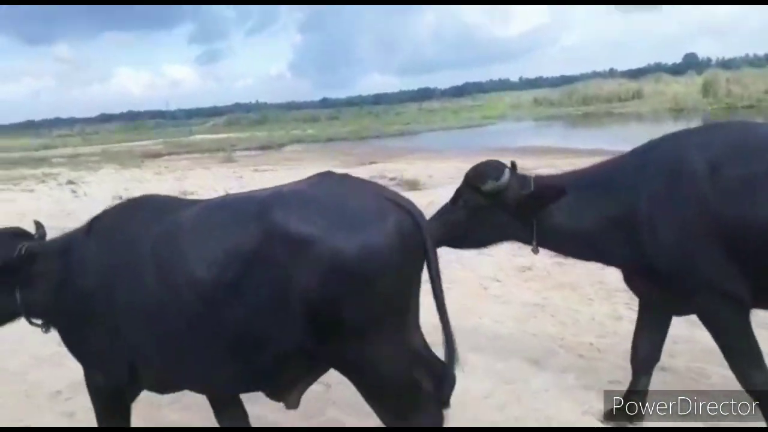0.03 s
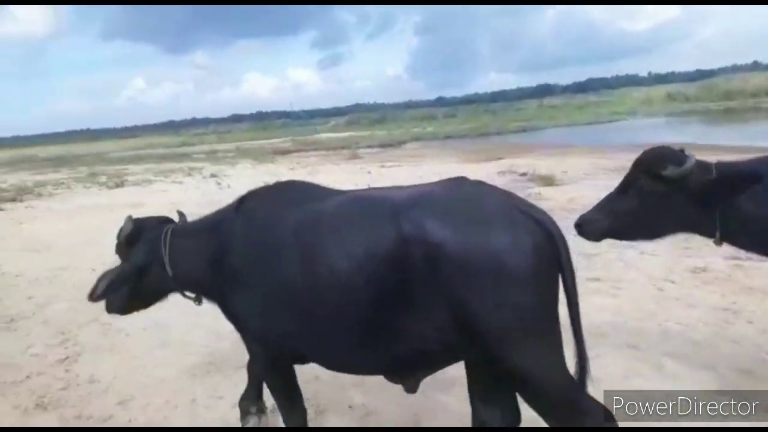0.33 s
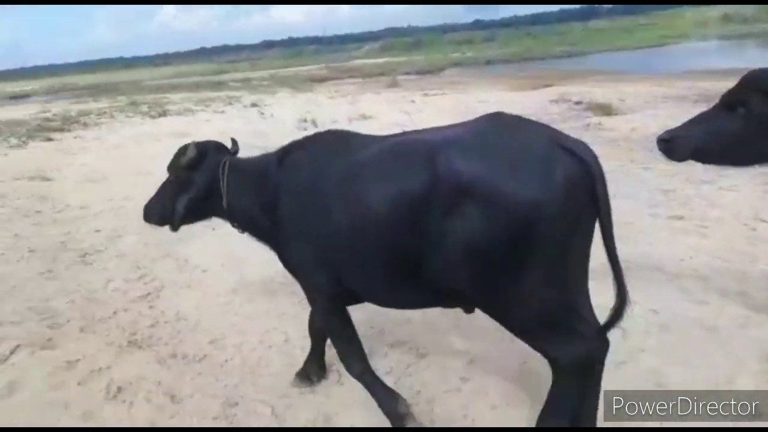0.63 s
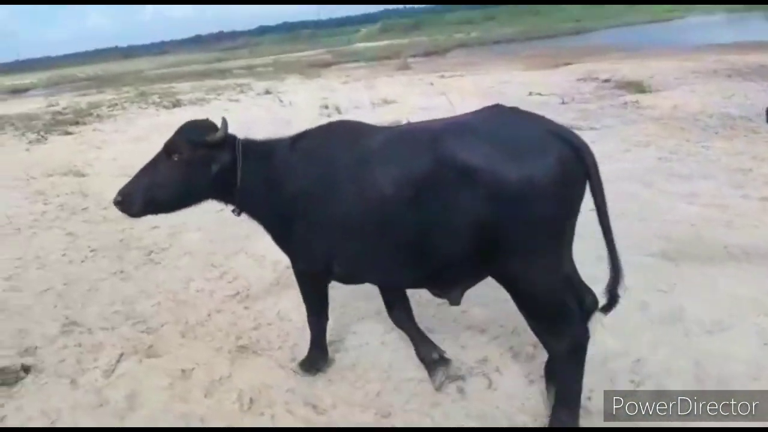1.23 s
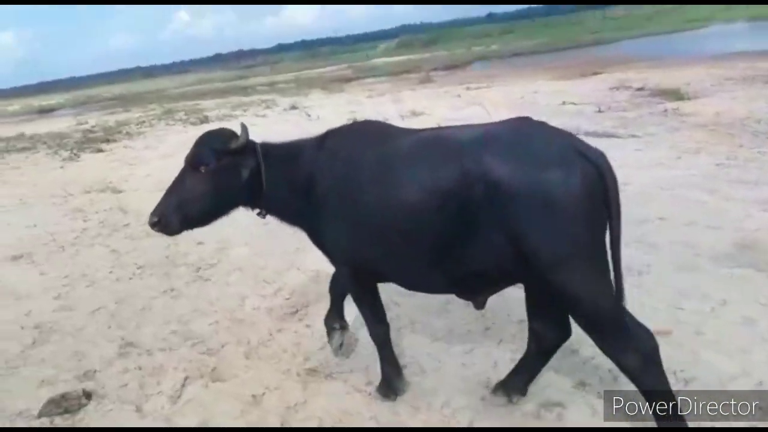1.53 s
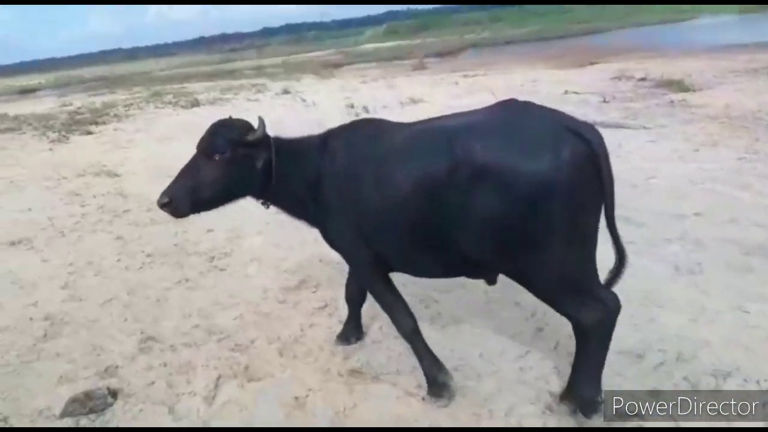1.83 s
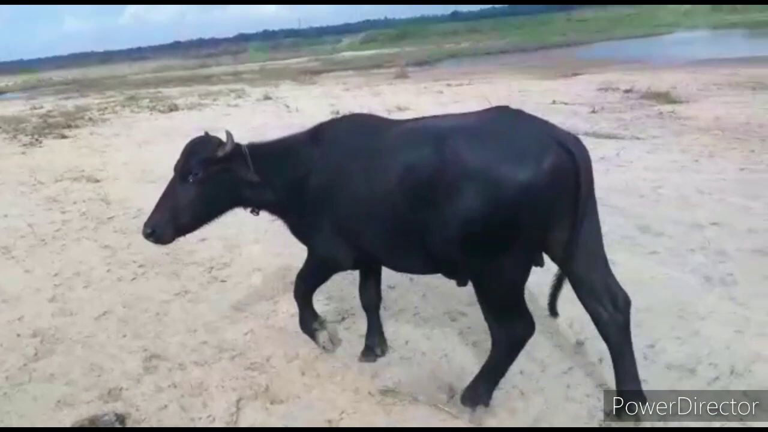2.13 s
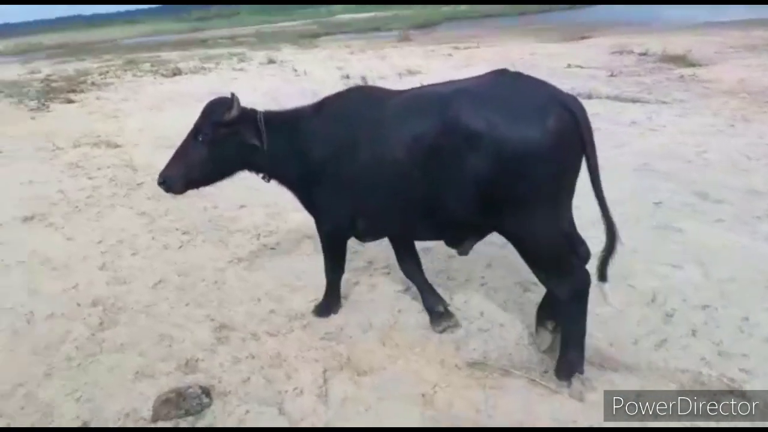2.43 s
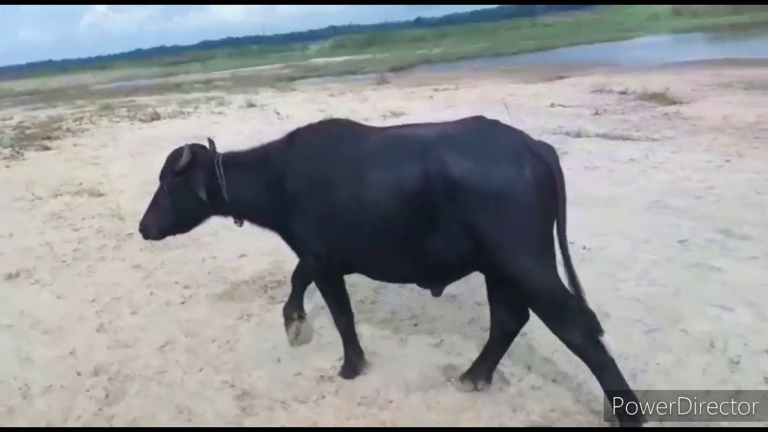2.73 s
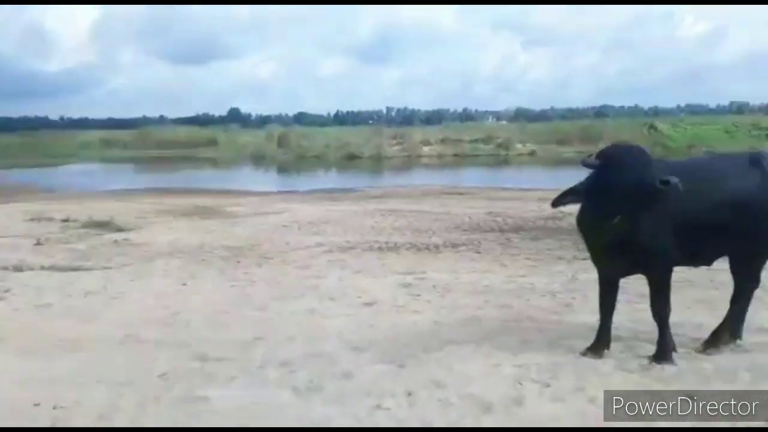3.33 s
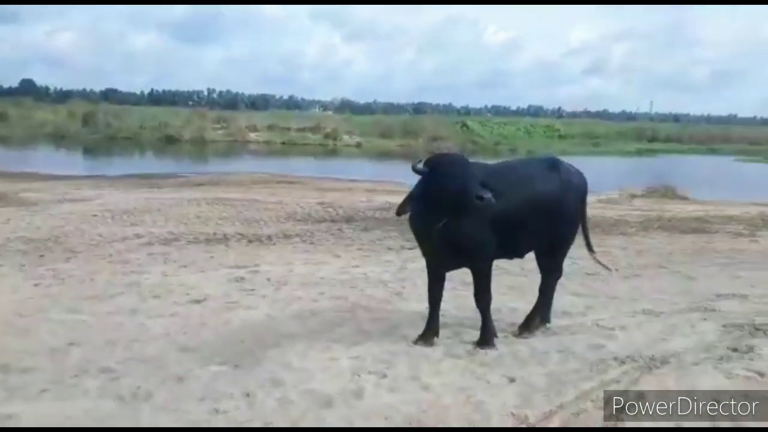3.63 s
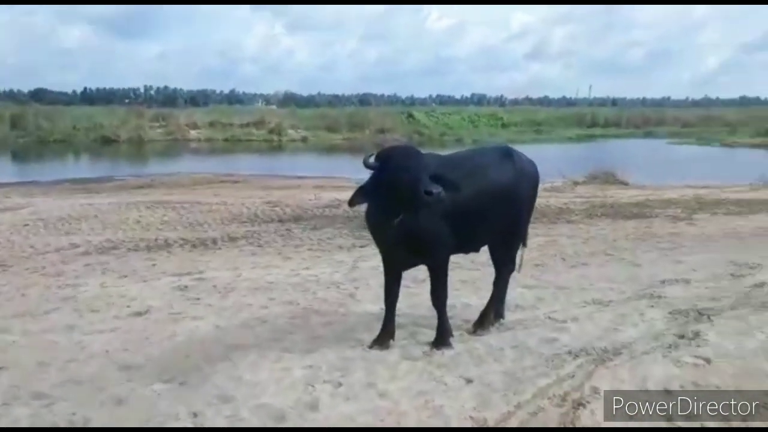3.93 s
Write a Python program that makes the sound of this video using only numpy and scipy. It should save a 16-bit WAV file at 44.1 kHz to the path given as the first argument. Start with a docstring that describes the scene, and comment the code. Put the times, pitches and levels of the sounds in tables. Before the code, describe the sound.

One brief, rough buffalo grunt, with light clicks, sandy scuffs and wind on the microphone.

```python
"""Sandy scuffs over a faint hiss as a water buffalo walks along a riverbank; small dry clicks sound now and
then. Halfway through it gives one short, creaky grunt. Slow pulses from its throat ring the mouth, nose and
throat cavity, while the mouth's ringing note sinks and rises again. Wind puffs and thumps on the microphone and
grows to a rumble at the end."""
import sys
import numpy as np
from scipy import signal
from scipy.fft import rfft, irfft, next_fast_len
from scipy.io import wavfile
from scipy.ndimage import uniform_filter1d, map_coordinates

SR = 44100
rng = np.random.default_rng(int(sys.argv[2]) if len(sys.argv) > 2 else 0)


def file_out(sig):
    """Save sig as 16-bit WAV at sys.argv[1]."""
    # one column per channel
    cols = np.atleast_2d(sig).T
    # limit, then scale
    lim = np.clip(cols, -1, 1)
    pcm = np.round(lim * 32767).astype(np.int16)
    wavfile.write(sys.argv[1], SR, pcm)


N = 176400

# tone colour of rubbing sand (frequency [Hz], level [dB])
SAND_COLOUR = [(200, -0.5), (700, -4.5), (2400, -0.5), (4000, -5), (5500, -13.5), (8500, -10), (11000, -21),
               (15500, -24)]


def amp(db):
    """Turn decibels into a factor to multiply by."""
    return 10 ** (np.asarray(db) / 20)


def unit(x):
    """Scale a sound to an average power of 1."""
    return x / np.sqrt(np.mean(x ** 2) + 1e-20)


def curves(rows):
    """Join a table's rows with straight lines: one curve for each column after the time."""
    times, *columns = np.transpose(rows)
    return [np.interp(np.arange(N) / SR, times, column) for column in columns]


def fade(t, t60):
    """Die away by 60 dB every t60 seconds."""
    return np.exp(-np.log(1000) * t / t60)


def wobble(rate):
    """A smooth curve through `rate` random points a second."""
    points = rng.standard_normal(int(N * rate / SR) + 4)
    return map_coordinates(points, [np.arange(N) * rate / SR])


def noise(colour):
    """Steady noise shaped by rows of (frequency [Hz], level [dB])."""
    row_hz, row_db = np.transpose(colour)
    hz = np.fft.rfftfreq(N, 1 / SR)
    gain = amp(np.interp(np.log(hz + 1), np.log(row_hz), row_db))
    return unit(irfft(rfft(rng.standard_normal(N)) * gain, N))


def add(track, start_s, sound):
    """Mix a sound into the track at the given time."""
    part = track[round(start_s * SR):][:len(sound)]
    part += sound[:len(part)]


def swell(peak_s, db, width_s):
    """Loudness that rises and falls in a bell shape."""
    t = np.arange(N) / SR
    return amp(db) * np.exp(-.5 * ((t - peak_s) / width_s) ** 2)


def grunt():
    """Each throat pulse rings the mouth, the nose and the throat cavity, and adds a short rasp."""
    # how fast the throat pulses (time [s], rate [pulses/s])
    pulse_rate = [(1.99, 22), (2.015, 46.4), (2.035, 52.2), (2.1, 55.7), (2.168, 57.9), (2.188, 84.9),
                  (2.215, 54.5), (2.245, 58.3), (2.31, 61.8)]
    # how the voice moves (time [s], level [dB], mouth note [Hz], spread around that note [octaves],
    # roughness [0-1], nose ring [dB])
    voice = [(1.993, -38, 2220, 0.2, 0.38, -8), (2.02, -31.5, 2180, 0.19, 0.42, -10),
             (2.04, -29, 1840, 0.2, 0.33, -4.5), (2.065, -24.5, 1620, 0.12, 0.19, -7),
             (2.11, -26.5, 1480, 0.17, 0.24, -9), (2.145, -26.5, 1290, 0.25, 0.3, -17),
             (2.165, -25.5, 1130, 0.18, 0.29, -15), (2.183, -25.5, 1175, .12, 0.04, -20),
             (2.195, -24, 1490, 0.59, 0.48, -8), (2.21, -23.5, 1180, .7, 0.49, -11),
             (2.228, -22, 1190, 0.37, .2, -36), (2.243, -23, 1570, 0.48, 0.28, -21),
             (2.26, -23.5, 1730, 0.18, 0.1, -13), (2.277, -25.5, 2170, 0.13, .16, -16),
             (2.312, -30, 2280, .15, 0, -5)]
    # notes the throat cavity rings at (frequency [Hz], level [dB], time to fade by 60 dB [s])
    cavity_notes = [(574, -6, 0.017), (812, -1.5, 0.017), (1175, -7, 0.037), (1498, -9, 0.037),
                    (1731, -6.5, 0.046), (2237, -6.5, 0.044), (2710, -13, 0.067), (3180, -9, 0.016),
                    (4200, -7, 0.026), (5800, -11, 0.023), (7100, -22, 0.026)]
    # tone colour of the rasp (frequency [Hz], level [dB])
    rasp_colour = [(200, -20), (550, 2.5), (1500, -1), (2750, -5), (2900, -20), (3080, -28), (3400, -5),
                   (3850, -29), (4350, -20.5), (5000, -20.5), (7000, -17.5), (9000, -37), (15000, -45.5)]
    start_s, end_s, nose_hz, far_note_db = 1.9931, 2.316, 2536, -11.5
    rate, = curves(pulse_rate)
    level_db, mouth_hz, spread, roughness, nose_db = curves(voice)
    voiced = np.arange(round(start_s * SR), round(end_s * SR))
    pulse_count = np.floor(np.cumsum(rate[voiced]) / SR)
    pulse_starts = voiced[np.diff(pulse_count, prepend=-1) > 0]
    out, t = np.zeros(N), np.arange(SR // 20) / SR
    rasp_noise = noise(rasp_colour)
    throat_band = signal.butter(2, [420, 3200], "bandpass", fs=SR, output="sos")
    attack = 1 - np.exp(-t / 0.00018)

    def note(hz, db, t60):
        return amp(db) * np.sin(2 * np.pi * hz * t) * fade(t, t60)

    for i in pulse_starts:
        ring = note(mouth_hz[i], db=-4, t60=0.014) + note(nose_hz, nose_db[i], t60=0.034)
        for hz, db, t60 in cavity_notes:
            # notes far from the mouth's note ring more weakly
            nearness = np.exp(-.5 * (np.log2(hz / mouth_hz[i]) / spread[i]) ** 2)
            note_hz = hz * (1 + rng.normal(0, 0.017))
            note_db = db + far_note_db * (1 - nearness) + rng.normal(0, 1.5)
            ring += note(note_hz, note_db, t60)
        rasp = amp(-2) * roughness[i] * rasp_noise[i:i + len(t)] * fade(t, t60=0.024)
        pulse = attack * rasp - signal.sosfilt(throat_band, attack * ring)
        add(out, i / SR, amp(level_db[i]) * pulse)
    return out


def with_echo(sound):
    """Add a weak, short echo from the ground and the animals around."""
    t = np.arange(SR // 3) / SR
    tail = rng.standard_normal(len(t)) * fade(t, t60=0.22)
    echo = signal.fftconvolve(sound, tail / np.linalg.norm(tail))[:N]
    return sound + amp(-16.5) * echo


def clicks():
    """Each dry click is a bright snap, a very short ring and a faint sandy tail."""
    # the clicks (time [s], level [dB], ring note [Hz], snap strength [dB])
    hits = [(0.0836, -32.5, 3500, -5), (.0902, -36.5, 3000, 1), (0.4842, -18, 3200, -37),
            (0.5005, -28, 2270, 8), (.531, -41, 2200, 1), (.5529, -17, 2800, -10), (.5793, -42, 3430, 6),
            (.7225, -37, 3200, -11.5), (1.347, -30, 1630, -6), (1.4573, -28.5, 1670, -3.5),
            (1.4792, -36.5, 1590, -2), (1.4995, -35, 1290, -12), (1.522, -36.5, 1300, -4),
            (2.5613, -25.5, 3200, -2), (2.6096, -32.5, 3220, -21), (2.7762, -29.5, 1360, -17.5),
            (2.798, -35, 1200, -16), (2.9514, -27.5, 8000, -3.5), (3.2206, -28, 2110, -15.5),
            (3.6675, -32.5, 3500, -18)]
    out, t = np.zeros(N), np.arange(SR // 30) / SR
    snap_band = signal.butter(2, [500, 9660], "bandpass", fs=SR, output="sos")
    snap = amp(8.5) * signal.sosfilt(snap_band, signal.unit_impulse(len(t)))
    sand = noise(SAND_COLOUR)
    for start_s, db, hz, snap_db in hits:
        ring = np.sin(2 * np.pi * hz * t) * fade(t, t60=0.0022)
        tail = amp(-16) * sand[round(start_s * SR):][:len(t)] * fade(t, t60=0.013)
        add(out, start_s, amp(db) * (ring + amp(snap_db) * snap + tail))
    return out


def scuffs():
    """Hooves push through sand in soft grainy swishes, some duller than others."""
    # the swishes (time [s], level [dB], width [s], treble fades above [Hz])
    swishes = [(0.021, -43.5, 0.027, 13200), (0.283, -52, 0.029, 15200), (0.373, -53, 0.029, 12000),
               (0.452, -54, 0.034, 8940), (0.6742, -41.5, 0.0014, 15000), (1.1144, -42, 0.0017, 13000),
               (1.297, -51.5, 0.012, 5000), (2.9, -59, 0.05, 5960), (3.095, -53.5, 0.016, 6000),
               (3.354, -46, 0.015, 4460), (3.845, -57.5, 0.015, 5020)]
    sand = unit(noise(SAND_COLOUR) * amp(0.6 * wobble(770)))
    out = np.zeros(N)
    for peak_s, db, width_s, top_hz in swishes:
        muffle = signal.butter(2, top_hz, fs=SR, output="sos")
        out += signal.sosfilt(muffle, swell(peak_s, db, width_s) * sand)
    return out


def sand_grains():
    """Grains of sand give tiny crackles at random moments."""
    grains_per_s = 22
    count, t = round(grains_per_s * N / SR), np.arange(SR // 50) / SR
    sand = noise(SAND_COLOUR)
    when, chance = rng.random((count, 2)).T
    grain_db = -58.5 - 4 * np.log(np.maximum(chance, .05))  # many quiet ones, a few louder
    starts = np.bincount((when * N).astype(int), amp(grain_db), N)
    return signal.fftconvolve(starts, fade(t, t60=0.014))[:N] * sand


def wind():
    """Air swirls at the microphone: stronger wind is louder and brighter."""
    # strength of the wind (time [s], level [dB])
    gusts = [(0, -70), (.25, -53), (.29, -33.5), (.325, -39.5), (.355, -37), (.39, -50), (.49, -44),
             (.57, -42.5), (.605, -65), (.65, -36.5), (.72, -58.5), (.87, -66), (.92, -45), (1.06, -54),
             (1.13, -45.5), (1.21, -51.5), (1.25, -44), (1.32, -41.5), (1.38, -54.5), (1.53, -55),
             (1.63, -39.5), (1.68, -50.5), (1.78, -53.5), (1.83, -36.5), (1.88, -66), (2.04, -60),
             (2.135, -43.5), (2.17, -49.5), (2.3, -48.5), (2.38, -56), (2.53, -57), (2.66, -42.5),
             (2.77, -48), (2.82, -39), (2.89, -44), (2.96, -50.5), (3.01, -33.5), (3.06, -29),
             (3.11, -38.5), (3.16, -31), (3.23, -49.5), (3.29, -35), (3.34, -47), (3.39, -36.5),
             (3.47, -47), (3.56, -33), (3.69, -16), (3.82, -21), (3.9, -23), (4, -20.5)]
    # tone colour of light puffs (frequency [Hz], level [dB])
    breeze_colour = [(20, -36), (45, -14.5), (85, -1), (140, -2.5), (200, -10.5), (300, -23.5),
                     (450, -37.5), (900, -56), (2000, -80)]
    # tone colour of strong wind (frequency [Hz], level [dB])
    gale_colour = [(20, -49), (45, -17), (100, -0.5), (160, 3), (250, -3), (330, -5), (480, -18),
                   (700, -28.5), (1100, -44.5), (1700, -68.5), (4000, -87.5)]
    gale_from_db, gale_full_db, flutter_db = -40.5, -24.5, 4
    level_db, = curves(gusts)
    gale_share = np.clip((level_db - gale_from_db) / (gale_full_db - gale_from_db), 0, 1)
    flow = np.sqrt(1 - gale_share) * noise(breeze_colour) + np.sqrt(gale_share) * noise(gale_colour)
    # even out the noise so that the gusts and the flutter set its loudness
    power = np.abs(uniform_filter1d(flow ** 2, size=1500))
    steady_flow = flow / np.sqrt(power + 1e-9)
    return amp(level_db + flutter_db * wobble(45)) * steady_flow


def wind_thumps():
    """A swirl of air hits the microphone: one lopsided swing of pressure with a small, faster kink."""
    # single swirls (time [s], level [dB], centre frequency [Hz])
    swirls = [(.292, -17.5, 221), (.3, -29, 167), (0.3517, -22, 151), (.559, -26.5, 113), (.642, -25, 102),
              (1.249, -24, 130), (1.296, -28.5, 117), (1.623, -28.5, 133), (1.636, -28, 130),
              (1.835, -24, 153), (2.658, -34.5, 124), (2.819, -33, 139), (3.556, -18.5, 235),
              (3.622, -22.5, 296), (3.642, -31, 350), (3.696, -17, 480), (3.701, -2.5, 173),
              (3.7546, -9, 295), (3.7779, -5, 185), (3.8215, -10.5, 350), (3.829, -10, 240),
              (3.86, -5, 226), (3.918, -14.5, 270), (3.93, -15, 360), (3.9391, -15, 307)]
    lean_radians, kink_db = 1, -27
    out, t = np.zeros(N), np.arange(-SR // 25, SR // 25) / SR

    def swing(hz):
        return np.real(np.exp(1j * lean_radians) / (1 - .5j * np.pi * hz * t) ** 5)

    for middle_s, db, hz in swirls:
        thump = swing(hz) + amp(kink_db) * swing(3.9 * hz)
        add(out, middle_s + t[0], amp(db) * thump)
    return out


def hiss():
    """The open riverbank: a slightly restless hiss, and a thin, distant rustle that swells twice."""
    # strength of the hiss (time [s], low and middle level [dB], treble level [dB])
    levels = [(0, -58, -66), (.2, -56, -66.5), (.55, -56, -71.5), (.8, -60, -71), (1.3, -60, -74.5),
              (1.5, -60, -74.5), (1.72, -58.5, -77.5), (1.9, -61.5, -73), (2.3, -54, -69),
              (2.5, -62, -74.5), (2.95, -58.5, -73.5), (3.45, -58, -73.5), (4, -58.5, -73.5)]
    # tone colour of the low and middle hiss (frequency [Hz], level [dB])
    air_colour = [(40, 2), (150, 3.5), (400, 2), (700, -2.5), (1200, -4.5), (1800, -4), (2450, 0.5),
                  (3000, -4.5), (4000, -12.5), (4800, -14.5), (5600, -35.5), (8000, -27)]
    # tone colour of the treble hiss (frequency [Hz], level [dB])
    fizz_colour = [(3000, -20), (5000, -2), (7500, -1.5), (9200, -2.5), (10500, -20), (12500, -8),
                   (14500, -5), (16000, -6.5)]
    # swells of the rustle (time [s], level [dB], width [s])
    rustles = [(.17, -59, 0.12), (1.73, -56, 0.042)]
    # whistling tone colour of the rustle (frequency [Hz], level [dB])
    rustle_colour = [(1200, -25), (1900, -13), (2300, -5.5), (2700, -14), (4000, -36.5)]
    air_db, fizz_db = curves(levels)
    air = amp(air_db + 0.27 * wobble(42)) * noise(air_colour)
    fizz = amp(fizz_db + 0.54 * wobble(5.9)) * noise(fizz_colour)
    rustle = sum(swell(*row) for row in rustles) * noise(rustle_colour)
    return air + fizz + rustle


def scene():
    """Everything in the open air, at one microphone."""
    mix = with_echo(grunt()) + wind() + wind_thumps() + clicks() + scuffs() + hiss() + sand_grains()
    return mix[None]


def record(dry):
    """The small microphone loses the deepest bass, and the highest treble is cut off."""
    bass_hz, top_hz = 42.8, 15700
    size = next_fast_len(N + SR // 2)
    hz = np.fft.rfftfreq(size, 1 / SR)
    gain = hz ** 2 / (hz ** 2 + bass_hz ** 2) * (hz < top_hz)
    return irfft(rfft(dry, size) * gain, size)[..., :N]


dry = scene()
out = record(dry)
file_out(out)
```